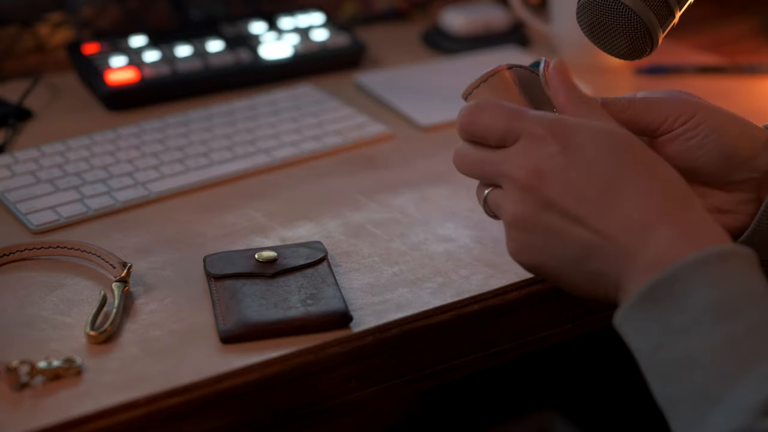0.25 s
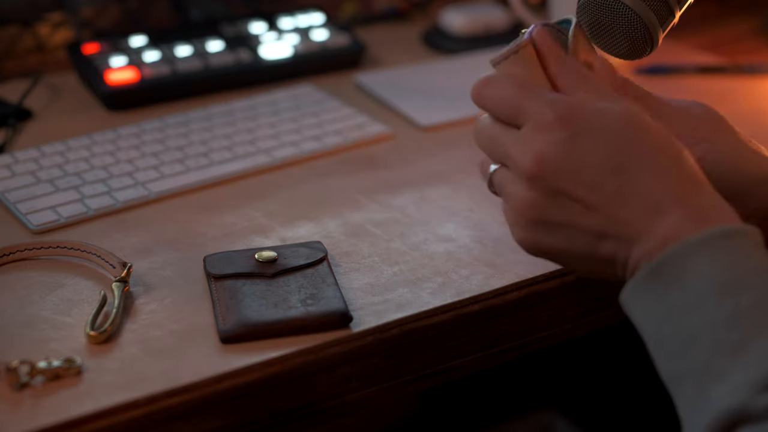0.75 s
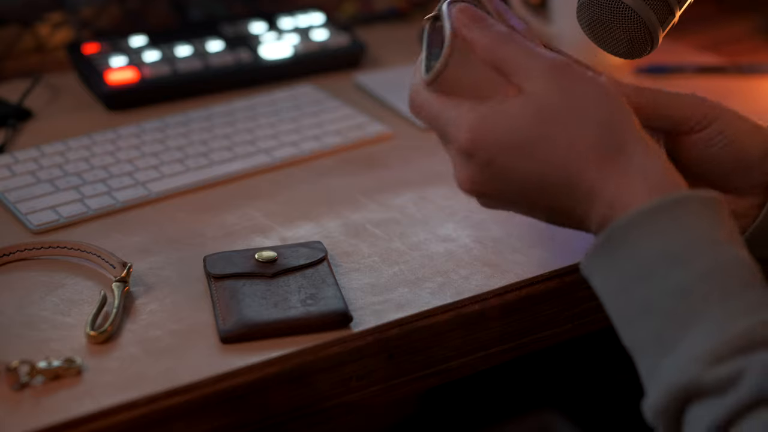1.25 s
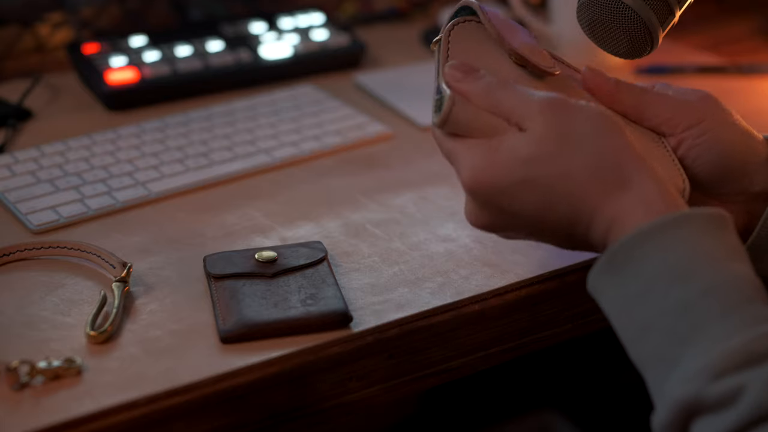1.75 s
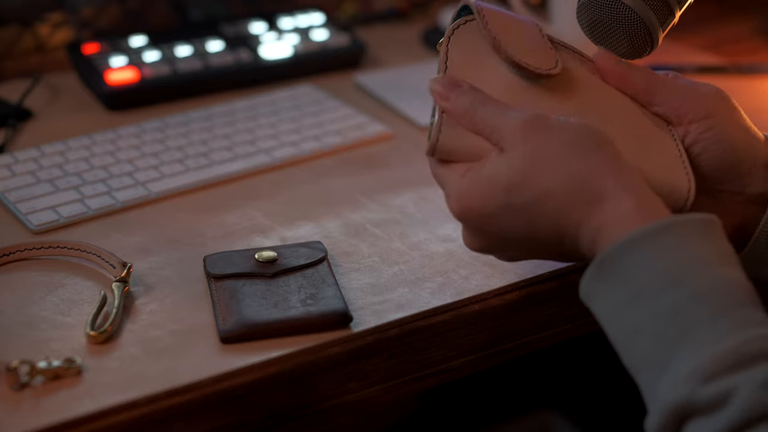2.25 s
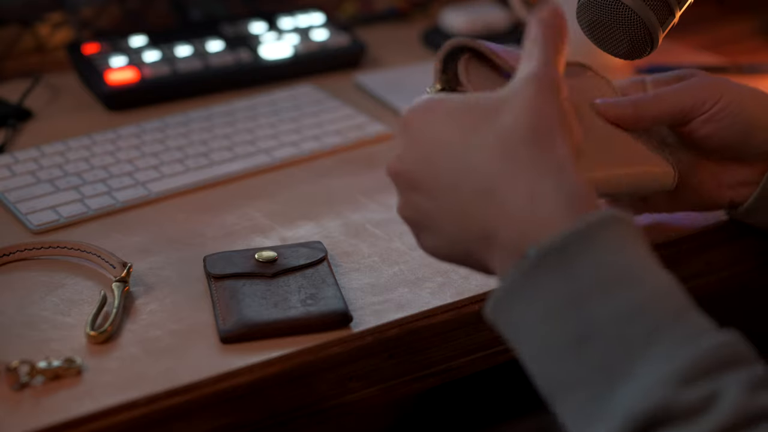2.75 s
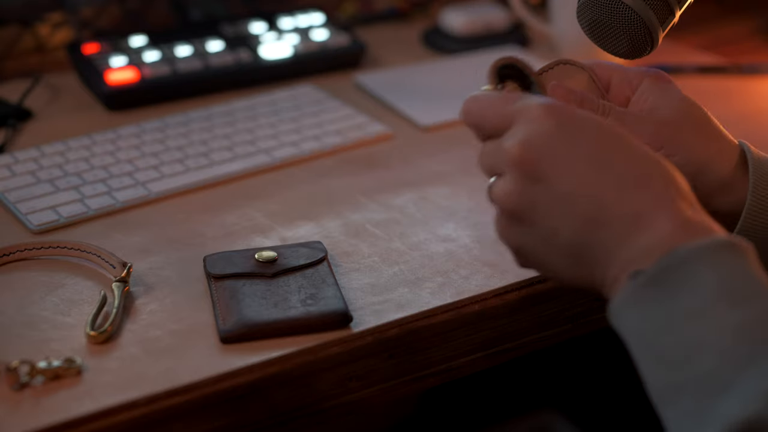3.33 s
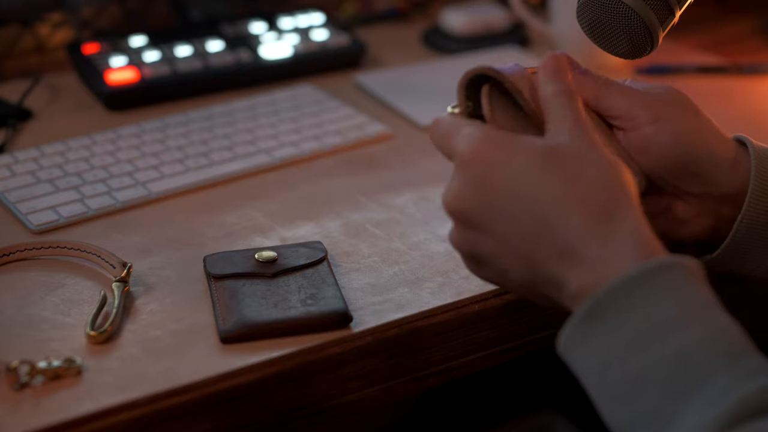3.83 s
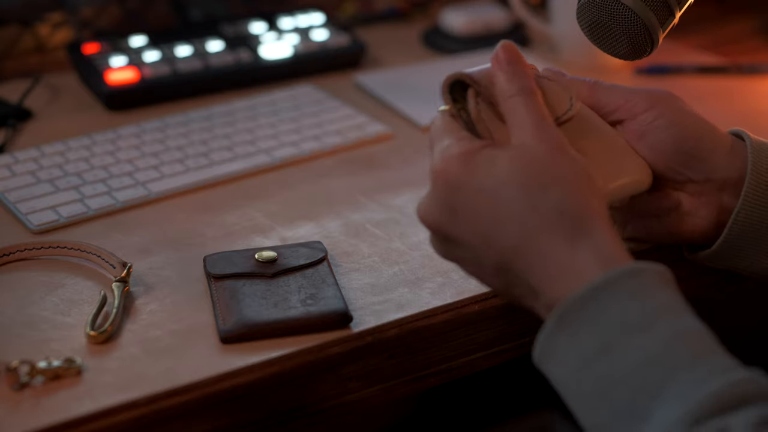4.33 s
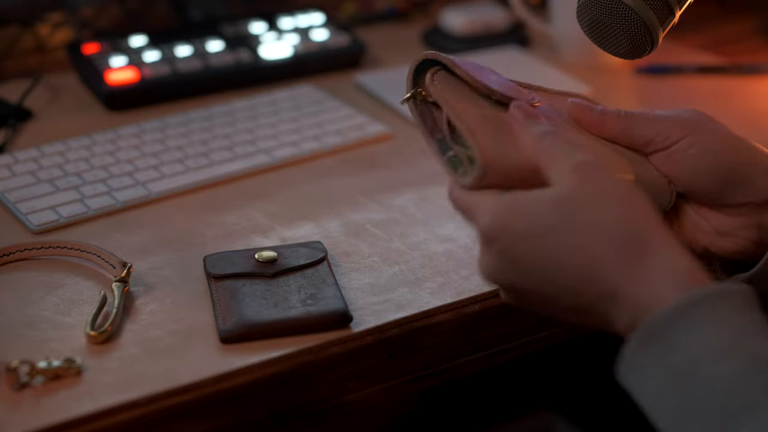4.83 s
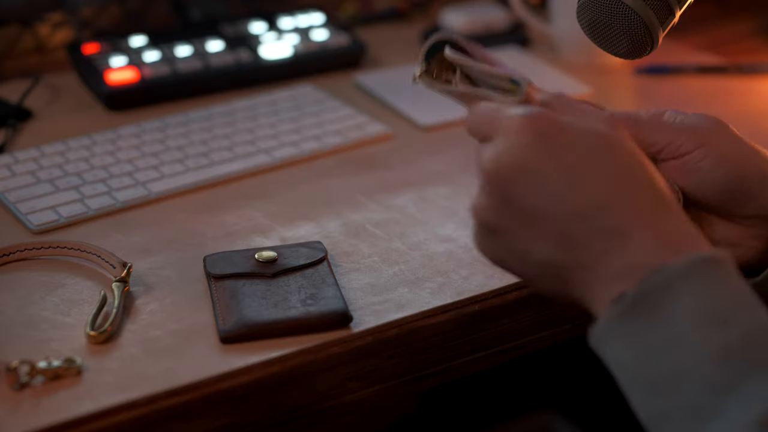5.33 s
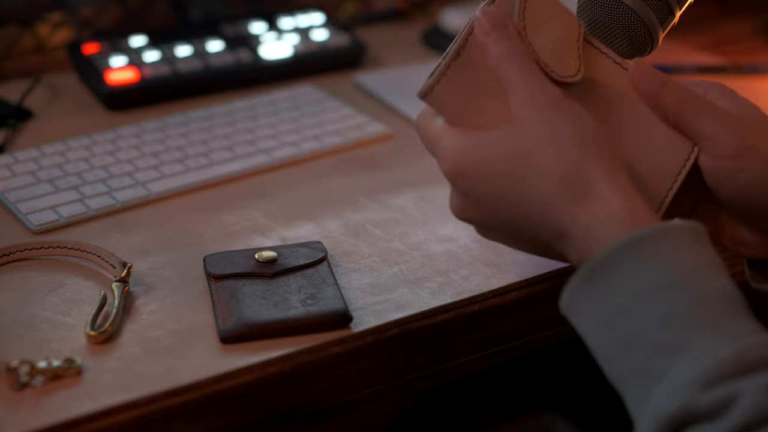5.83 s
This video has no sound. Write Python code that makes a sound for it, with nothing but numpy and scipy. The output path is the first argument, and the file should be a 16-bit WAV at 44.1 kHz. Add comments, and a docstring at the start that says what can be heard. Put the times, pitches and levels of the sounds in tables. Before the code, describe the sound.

A stiff wallet is bent and folded by hand, heard very near in a small quiet room. Irregular bright leather snaps open, with a heavy jolt among them, then the handling nearly stops. Grainy skin rustle and quick creaking runs resume, peak in a dense stuttering creak past the middle, and thin out through a short hollow groan to light clicks and faint rubbing over steady soft noise.

```python
"""In a quiet room, close to a desk microphone, a stiff leather wallet is flexed and folded by hand.
Its faces stick and slip: short bursts of noise make sharp snaps, runs of creaks and a dense crackle.
Skin rustles and drags over the leather as wavering or grainy noise. The hollow pockets ring briefly,
and a squeezed one groans. The handling shakes a low resonance of desk and stand, over a soft steady
background noise."""
import sys
import numpy as np
from scipy import signal
from scipy.fft import rfft, irfft, next_fast_len
from scipy.io import wavfile
from scipy.ndimage import map_coordinates

SR = 44100
rng = np.random.default_rng(int(sys.argv[2]) if len(sys.argv) > 2 else 0)


def unload_audio(sound):
    """Save the sound as a 16-bit wav file, at the path given as the first command line argument."""
    columns = np.transpose(np.atleast_2d(sound))
    # keep every value between -1 and 1, then stretch to whole-number steps
    steps = np.round(np.clip(columns, -1, 1) * 32767)
    wavfile.write(sys.argv[1], SR, steps.astype(np.int16))


def makeup_ratio(level_db):
    """Linear amplitude ratio for a level in decibels (20 dB per factor of ten)."""
    decades = np.asarray(level_db, float) / 20
    return 10 ** decades


N = 268128  # length of the scene in samples

# All levels in the tables are relative: the functions may add a fixed number of dB to a whole column.
# Steady noise of room and preamplifier, its colour: pitch_hz, level_db (per Hz)
BACKGROUND_COLOUR = [(18, -51.5), (30, -10.5), (97, -6.5), (379, -17), (492, -16.5), (691, -37.5),
                     (874, -16), (1360, -24.5), (9000, -28), (15500, -27)]
# How long the room's answer takes to fall by 60 dB: pitch_hz, fall_s
ROOM_FALL = [(300, 0.17), (3000, 0.16), (12000, 0.036)]
# Resonances of desk and microphone stand: pitch_hz, width_hz, level_db
STAND_MODES = [(90.9, 12.3, 2), (158, 95, -6), (284, 236, -8.5)]
# Slips that also jolt the whole wallet: start_s, level_db
WALLET_JOLTS = [(0.054, -50.5), (0.176, -52), (0.222, -48.5), (.341, -29.5), (0.68, -45), (1.978, -64),
                (3.935, -55.5)]
# Handling rumble, above or below what the effort gives: time_s, level_db
RUMBLE_CHANGES = [(0, 4.5), (.35, 6), (.6, 1.5), (.86, 4.5), (1.3, -1.5), (1.58, -5), (1.68, 3),
                  (2.3, -0.5), (2.42, -26), (2.56, 4), (2.9, -0.5), (3.4, 1.5), (3.82, -5), (3.95, -0.5),
                  (4.49, 6), (4.7, -0.5), (4.93, 5), (5.3, -5), (5.5, 6), (6.08, -1)]
# How hard the hands work the leather, as loudness of the rustle: time_s, level_db
HAND_EFFORT = [(0, -60), (.16, -58.5), (.3, -59), (.39, -50.5), (.42, -60), (.57, -57), (.68, -50.5),
               (.74, -63.5), (.87, -62), (.91, -69.5), (1.01, -80), (1.27, -74.5), (1.59, -69.5),
               (1.65, -60.5), (1.72, -60), (1.79, -53.5), (1.92, -50), (1.95, -65), (1.99, -49.5),
               (2.01, -60), (2.06, -48), (2.17, -59.5), (2.33, -55), (2.37, -71.5), (2.48, -72),
               (2.55, -58), (2.66, -64.5), (2.73, -74.5), (2.76, -57), (2.8, -60.5), (2.93, -51),
               (3.0, -53), (3.28, -44), (3.39, -48), (3.43, -60), (3.52, -59), (3.57, -53), (3.71, -68),
               (3.84, -67.5), (3.92, -51), (4.08, -62), (4.18, -58), (4.22, -62.5), (4.28, -61.5),
               (4.32, -55), (4.4, -62), (4.5, -64.5), (4.6, -76.5), (4.63, -86.5), (4.7, -75.5),
               (4.77, -66.5), (4.84, -61), (4.93, -60.5), (5.04, -64), (5.1, -78), (5.25, -73.5),
               (5.32, -72), (5.39, -70), (5.44, -61), (5.52, -66.5), (5.61, -62.5), (5.68, -81.5),
               (5.9, -90), (6.0, -77.5), (6.08, -84.5)]
# The fold of the wallet: time_s, pocket_db (ring compared with rustle), shut (0 open to 1 pressed shut)
FOLDING = [(0, -7, 0.04), (.34, 4.5, 0.19), (.69, -0.5, 0.16), (.86, 5, 0.2), (1.27, -1, 0.65),
           (1.68, 9, 0.24), (1.95, 0.5, 0.02), (2.3, -1, 0.27), (2.75, 0, 0.13), (3.0, 2, .8),
           (3.35, 3.5, 0.68), (3.5, 0.5, 0.7), (3.8, 3.5, 0.66), (4.0, -2.5, .3), (4.3, -1.5, 0.3),
           (4.49, 6.5, 0.47), (4.8, -0.5, 0.13), (5.3, 0.5, 0.33), (5.44, 1.5, 0), (6.08, 3, 0.96)]
# Pockets of the open wallet: pitch_hz, width_hz, level_db
OPEN_POCKETS = [(418, 142, 0), (1048, 640, 6.5), (1737, 1660, 1)]
# Pockets pressed shut: pitch_hz, width_hz, level_db
SHUT_POCKETS = [(613, 112, 1), (805, 44.5, 1.5), (1334, 100, -13)]
# Fingers dragging over the leather, each in one band: start_s, length_s, pitch_hz, level_db
FINGER_STROKES = [(0.34, 0.028, 490, -43.5), (0.669, 0.035, 447, -53), (1.27, 0.17, 1320, -70.5),
                  (1.3, 0.26, 6860, -68.5), (1.999, 0.086, 302, -59.5), (4.293, 0.14, 3150, -61),
                  (5.428, 0.04, 1590, -54.5), (5.575, 0.027, 4170, -49.5), (0.443, 0.018, 1790, -53.5)]
# Slow slips deep in a squeezed pocket, a low groan: start_s, level_db
SLOW_SLIPS = [(4.438, -56), (4.448, -51), (4.457, -47), (4.467, -44.5), (4.484, -42.5), (4.507, -45.5),
              (4.52, -57)]
# Resonances of the squeezed pocket: pitch_hz, width_hz, level_db
SQUEEZED_POCKET = [(787, 43, 2), (1080, 51, -7.5)]
# Colour of the leather surface: pitch_hz, level_db (per Hz)
LEATHER_COLOUR = [(710, -40), (1200, 2), (1240, 1.5), (1950, -14.5), (5300, -2.5), (9410, -5.5),
                  (16000, -17.5)]
# Treble above about 7 kHz, compared with what the effort gives: time_s, level_db
TREBLE_CHANGES = [(0, -0.5), (.6, 5), (1.2, 0), (1.7, 0), (2.2, 2.5), (2.75, -1), (3.4, -7), (3.57, 1),
                  (3.9, 1), (4.28, -5), (4.36, 16.5), (4.5, -3.5), (5.0, 3.5), (6.08, -2.5)]
# Creaks, each a run of slips: start_s, length_s, mean_gap_s, level_db (over the rustle), pitch_hz
CREAK_RUNS = [(1.475, 0.11, 0.008, 23, 7300), (1.62, 0.11, 0.014, 31.5, 7200),
              (1.736, .035, 0.0082, 22, 6900), (1.806, 0.04, 0.014, 27.5, 5000),
              (1.879, 0.043, 0.011, 18, 4630), (2.878, 0.029, 0.0079, 15, 5200),
              (2.946, .09, .0094, 18, 5030), (3.054, 0.042, .022, 22, 4640), (3.2, 0.09, .0115, 14, 5270),
              (3.301, 0.09, 0.0087, 17.5, 5600), (3.542, 0.039, 0.0069, 26, 7200),
              (3.65, 0.034, 0.0099, 23, 6100), (3.859, 0.051, 0.0098, 25.5, 5500),
              (4.007, 0.041, 0.0087, 30.5, 7300), (4.153, 0.029, 0.0053, 24, 6250),
              (4.34, 0.024, 0.013, 27.5, 8540), (4.754, 0.019, 0.01, 32.5, 6840),
              (0.382, .022, .007, 17.5, 5030), (0.435, 0.025, 0.0086, 21.5, 6000),
              (3.734, 0.14, 0.012, 19, 7500), (5.139, .04, 0.011, 22, 6500), (5.977, .04, 0.014, 19, 7000)]
# Slips placed one by one, faint to loud, among them the long creak near 3.0-3.4 s:
# start_s, level_db, pitch_hz, pocket_db (knock compared with the snap)
PLACED_SLIPS = [(0.026, -38.5, 6500, -28), (0.0507, -25.5, 3900, -11), (0.071, -36.5, 5030, -14),
                (.103, -22, 4380, -20), (.11, -28, 5270, -20.5), (0.1775, -18, 4300, -12.5),
                (.204, -22.5, 5210, -28), (0.2231, -17, 5030, -15.5), (0.2618, -20, 4230, -15),
                (.303, -27, 7800, -14.5), (0.3178, -21, 4130, -30), (.339, -10.5, 5000, -11.5),
                (.3678, -25, 5440, -24.5), (0.3855, -26, 5480, -22), (.436, -32, 6400, -19),
                (.4824, -27.5, 6300, -15), (.507, -32, 5300, -14.5), (0.546, -32.5, 5820, -10),
                (0.5894, -14.5, 7000, -29), (.6077, -40, 4560, -13), (0.6382, -25, 6060, -19),
                (.7, -31.5, 4480, -2.5), (0.752, -35.5, 4360, -13), (0.829, -42, 6590, -20),
                (0.9478, -37.5, 4700, -16), (1.123, -56, 5000, -13), (1.2123, -50, 7000, -14),
                (1.7304, -27, 7000, -24), (1.7772, -24.5, 5940, -16), (1.7833, -28, 5630, -12),
                (1.8718, -24.5, 5250, -10), (1.9043, -21.5, 6360, -17), (1.9188, -25, 4480, -7.5),
                (1.966, -38.5, 5850, -19), (1.9765, -26.5, 3760, -3.5), (2.016, -36, 5810, -25),
                (2.03, -31, 5640, -9.5), (2.0387, -25, 4660, -22), (2.0522, -22.5, 5830, -20),
                (2.0705, -30.5, 3680, -2), (2.0783, -28, 5480, -38), (2.11, -29, 3230, -27),
                (2.1335, -26, 4130, -22), (2.224, -35, 6200, -12), (2.493, -43, 7490, -20),
                (2.5183, -37, 5870, -15), (2.5374, -39.5, 4300, -5), (2.619, -32.5, 5600, -10.5),
                (2.7551, -32, 4900, -9.5), (2.7898, -40, 5540, -13), (2.8271, -33, 3540, -9.5),
                (2.9255, -32, 4850, -15), (3.034, -30, 4320, -6.5), (3.0387, -27.5, 5540, -20),
                (3.0634, -25.5, 5070, -11.5), (3.083, -24.5, 4300, -16), (3.1084, -28.5, 4140, -14),
                (3.1252, -25, 4500, -27), (3.1366, -27, 4200, -8), (3.1536, -26.5, 4140, -21.5),
                (3.1762, -24, 4220, -35), (3.203, -25, 4070, -6), (3.223, -23.5, 4200, -38),
                (3.239, -24.5, 4220, -25), (3.259, -21, 4600, -7.5), (3.279, -31, 5110, -3),
                (3.298, -16.5, 4400, -30), (3.321, -19.5, 4350, -20), (3.333, -27.5, 4600, -27),
                (3.3433, -20.5, 4300, -11), (3.3651, -20, 4300, -14), (3.3737, -17, 4770, -13.5),
                (3.3941, -16.5, 4220, -26), (3.4563, -42, 5440, -14), (3.4646, -29.5, 7560, -8.5),
                (3.4714, -26, 5600, -19), (3.6433, -35.5, 6260, -12), (3.813, -39.5, 6210, -16),
                (3.8396, -39, 6500, -20), (3.8776, -32.5, 4200, -36), (3.9334, -21.5, 4640, -20.5),
                (3.9857, -31.5, 4240, -19), (4.1039, -31, 5740, -17), (4.113, -30, 7700, -36),
                (4.1824, -27.5, 6100, -20), (4.2123, -36.5, 4820, -12), (4.245, -30.5, 7650, -27),
                (4.2642, -41, 5420, -26), (4.2802, -31, 8800, -39), (4.3065, -29.5, 4020, -14.5),
                (4.457, -46, 2500, -2), (4.467, -49, 2500, -4), (4.4836, -43.5, 3100, 4.5),
                (4.507, -37, 3650, -14), (4.5772, -52, 2500, 1.5), (4.7946, -33.5, 5670, -18),
                (4.86, -38, 6400, -22), (5.0238, -38, 6400, -17), (5.1275, -39.5, 5360, -24),
                (5.2078, -41, 5230, -15), (5.226, -42.5, 5030, -15), (5.3435, -40, 7100, -30),
                (5.3592, -50, 6000, -4), (5.3815, -45.5, 3570, -4.5), (5.4021, -36, 5160, -17),
                (5.431, -48, 3300, -8), (5.6074, -32, 5700, -33), (5.632, -37, 5600, -39.5)]

BACKGROUND_DB = -75.6
REFERENCE_EFFORT_DB = -58
RUMBLE_DB, RUMBLE_GROWS = -65.5, 0.61  # level at reference effort; dB gained per dB of effort
DULLING = 0.2  # treble dB lost per dB of effort
SHIFT_DB, FLUTTER_DB = 3, 1.5  # strength of the slow and fast wavering of the skin rustle
SLOWING = 0.035  # each gap in a creak grows by this share of the mean gap
CREAK_POCKET_DB = -19  # pocket knock compared with the slip, before a fixed lift
GAP_SCATTER, SIZE_SCATTER_DB, PITCH_SCATTER = 0.05, 2.5, 0.07  # gap and pitch scatter are shares
SWELL_DB, SWELL_SLIPS = 5.5, 1.4  # a run starts this much softer; the lack fades over this many slips
BREADTH_PER_DB = 0.02  # weaker slips free a smaller patch, with a narrower band
RELEASE, RELEASE_SHUT = 5, 7  # sharpness of a slip's first instant; more when pressed tight


def unit(x):
    """Scale to an average (rms) level of 1."""
    return x / np.sqrt(np.mean(x ** 2) + 1e-20)


def along(points, hz):
    """Read (pitch, value) points on a logarithmic pitch axis."""
    f, value = np.transpose(points)
    return np.interp(np.log(hz + 1), np.log(f + 1), value)


def curves(rows):
    """Give one value per sample for each column after the time."""
    s, *columns = np.transpose(rows)
    return [np.interp(np.arange(N) / SR, s, column) for column in columns]


def wobble(rate):
    """A smooth random curve with this many random points a second."""
    points = rng.standard_normal(int(N * rate / SR) + 4)
    return map_coordinates(points, [np.arange(N) * rate / SR])


def filtered(x, response):
    """Colour a sound by a response to each frequency."""
    size = next_fast_len(x.shape[-1] + 8192)
    spectrum = rfft(x, size) * response(np.fft.rfftfreq(size, 1 / SR))
    return irfft(spectrum, size)[..., :x.shape[-1]]


def resonances(modes):
    """Ringing modes side by side, with alternating sign, as a response to frequency."""
    def response(f):
        total = 0
        for k, (hz, width, db) in enumerate(modes):
            mode = 1j * f * width / (hz * hz - f * f + 1j * f * width)
            total = total + (-1) ** k * makeup_ratio(db) * mode
        return total
    return response


def laid(s, shapes):
    """Add short sounds together at their start times."""
    at = np.round(s * SR).astype(int)[:, None] + np.arange(shapes.shape[1])
    return np.bincount(at.ravel(), shapes.ravel(), N + SR)[:N]


def effort():
    """The rustle level, and how far it stands above the reference effort (dB)."""
    rustle_db, = curves(HAND_EFFORT)
    return rustle_db, rustle_db - REFERENCE_EFFORT_DB


def pockets(x):
    """The hollow ring passes from the open to the narrower shut resonances as the fold is pressed."""
    shut = np.clip(curves(FOLDING)[1], 0, 1)
    open_ring = np.sqrt(1 - shut) * filtered(x, resonances(OPEN_POCKETS))
    shut_ring = np.sqrt(shut) * makeup_ratio(5) * filtered(x, resonances(SHUT_POCKETS))
    return open_ring + shut_ring


def snaps(s, db, hz, t60, tail_db, tail_t60, breadth, size, release):
    """A slip: one sharp release and a shiver after it, coloured by the patch that let go."""
    t = np.arange(size) / SR
    fading = makeup_ratio(-60 * t / t60) + makeup_ratio(tail_db - 60 * t / tail_t60)
    burst = rng.standard_normal((len(s), size)) * fading
    burst[:, 0] = -release
    f, center = np.fft.rfftfreq(size, 1 / SR), hz[:, None]
    width = breadth * center
    patch = 1j * f * width / (center * center - f * f + 1j * f * width)
    shape = irfft(rfft(burst) * patch ** 2, size)
    shape *= (2.97 * makeup_ratio(db) / np.linalg.norm(shape, axis=1))[:, None]  # set each slip's energy
    return laid(s, shape)


def hush():
    """Steady background noise of room and preamplifier, coloured by its own curve."""
    noise = filtered(rng.standard_normal(N), lambda hz: makeup_ratio(along(BACKGROUND_COLOUR, hz)))
    return makeup_ratio(BACKGROUND_DB) * unit(noise)


def room(x):
    """The room answers with a noise tail in which each frequency dies at its own speed."""
    hz, t, z = signal.stft(rng.standard_normal(SR // 3), SR, nperseg=256)
    fading = makeup_ratio(-60 * t / along(ROOM_FALL, hz)[:, None])
    tail = signal.istft(z * fading, SR, nperseg=256)[1]
    delayed = np.pad(x, (200, 0))  # samples
    return signal.fftconvolve(delayed, tail / np.linalg.norm(tail))[:N]


def handling():
    """Shifting hands and jolts shake the desk and the microphone stand."""
    rumble_db = RUMBLE_DB + RUMBLE_GROWS * effort()[1] + curves(RUMBLE_CHANGES)[0]
    restless = rng.standard_normal(N) * makeup_ratio(0.33 * wobble(15))
    shake = unit(filtered(restless, resonances(STAND_MODES)))
    s, db = np.transpose(WALLET_JOLTS)
    t = np.arange(1024) / SR
    push = -np.sin(2 * np.pi * 170 * t) * makeup_ratio(-60 * t / 0.028)
    jolts = laid(s, makeup_ratio(db + 7.5)[:, None] * push)
    jolts = filtered(jolts, lambda hz: 1j * hz / (70 + 1j * hz))  # lose the lowest bass
    return makeup_ratio(rumble_db) * shake + jolts


def strokes():
    """Grainy friction noise swells and fades in one broad resonance of the gripped patch."""
    out = np.zeros(N)
    for s, length, hz, db in FINGER_STROKES:
        n = int(length * SR)
        rub = rng.standard_normal(n) * np.sqrt(rng.exponential(size=n))
        band = resonances([(hz, 0.95 * hz, 0)])
        sung = unit(filtered(rub, lambda f: band(f) ** 2))
        out[int(s * SR):][:n] += makeup_ratio(db) * sung * np.hanning(n) ** 0.73
    return out


def groan():
    """Each slow slip pushes the air of the squeezed pocket, which rings on."""
    s, db = np.transpose(SLOW_SLIPS)
    pushes = laid(s, makeup_ratio(db + 25)[:, None] * np.hanning(16))
    return filtered(pushes, resonances(SQUEEZED_POCKET))


def crackle(per_second, spread_db, clump_db):
    """Countless tiny slips in clumps, a few much larger than the rest; rms 1."""
    place, size, pitch = rng.random((int(per_second * N / SR), 3)).T
    db = -spread_db * np.log(size + 0.097)
    hz = 2200 * 6.2 ** pitch
    ticks = snaps(place * (N / SR), db, hz, t60=0.022, tail_db=5, tail_t60=0.016,
                  breadth=1.55, size=512, release=8.3)
    return unit(ticks * makeup_ratio(clump_db * wobble(25)))


def flexing():
    """Crackle and skin rustle sound through the surface and, duller, through the pockets."""
    rustle_db, extra_db = effort()
    pocket_db = curves(FOLDING)[0]
    bright_db = 2.5 - DULLING * extra_db + curves(TREBLE_CHANGES)[0]
    waver_db = FLUTTER_DB * wobble(40) + SHIFT_DB * wobble(12)
    skin = unit(rng.standard_normal(N) * makeup_ratio(waver_db))
    drive = 0.75 * crackle(per_second=500, spread_db=4.0, clump_db=0.94) + 0.67 * skin
    surface = unit(filtered(drive, lambda hz: makeup_ratio(along(LEATHER_COLOUR, hz))))
    # lighter rubbing tilts the sound toward the treble, harder work away from it
    top = filtered(surface, lambda hz: 1 / (1 + (7000 / (hz + 1)) ** 4))
    tilted = surface + (makeup_ratio(bright_db) - 1) * top
    hollow = unit(pockets(drive))
    return makeup_ratio(rustle_db - 0.96) * tilted + makeup_ratio(rustle_db + pocket_db - 5.0) * hollow


def creaks():
    """Each run slips again and again, ever slower, as loud as the hands press; columns as in PLACED_SLIPS."""
    start, length, gap, over_db, hz = np.transpose(CREAK_RUNS)[..., None]
    k = np.arange(20)  # slips in a run, counted from 0
    draw = rng.standard_normal((len(CREAK_RUNS), 4, len(k)))
    slowing = 1 + SLOWING * (k - length / gap / 2)
    gaps = gap * slowing * np.exp(GAP_SCATTER * draw[:, 0])
    s = start + np.cumsum(gaps, axis=1) - gaps
    s = np.minimum(s, (N - 1) / SR)
    db = effort()[0][(s * SR).astype(int)] + over_db
    db = db - SWELL_DB * np.exp(-k / SWELL_SLIPS) + SIZE_SCATTER_DB * draw[:, 1]
    db = db - 200 * (s > start + length)  # silence slips past the end of the run
    pitch = hz * np.exp(PITCH_SCATTER * draw[:, 2])
    columns = s, db, pitch, CREAK_POCKET_DB + 5 * draw[:, 3]
    return np.reshape(columns, (len(columns), -1))


def slips():
    """Placed slips and creak runs: each slip a bright snap, and a knock that rings the pockets."""
    s, db, hz, pocket_db = np.hstack([np.transpose(PLACED_SLIPS), creaks()])
    # leather pressed tight rings in a narrower band and breaks sharper
    shut = curves(FOLDING)[1][(s * SR).astype(int)]
    breadth = np.clip(1.6 - 0.84 * shut + BREADTH_PER_DB * (db + 30), 0.4, 3)[:, None]
    bright = snaps(s, db + 0.21, hz, t60=0.013, tail_db=-7.5, tail_t60=0.03,
                   breadth=breadth, size=2048, release=RELEASE + RELEASE_SHUT * shut)
    knock = snaps(s, db + pocket_db + 10.0, np.full(len(s), 1100), t60=0.026, tail_db=-6.5,
                  tail_t60=0.1, breadth=11.8, size=2048, release=9.2)
    # soft leather damps the highest treble of each snap
    soft = filtered(bright, lambda f: 1 / (1 + 1j * f / (0.59 * 12500) - (f / 12500) ** 2))
    return soft + pockets(knock)


def scene():
    """The wallet, its room answer, the handling and the background, as one channel."""
    wallet = slips() + flexing() + groan() + strokes()
    return (wallet + makeup_ratio(-13.5) * room(wallet) + handling() + hush())[None]


def top_cut(x):
    """Nothing passes above the cut-off."""
    return signal.sosfilt(signal.butter(12, 16820, fs=SR, output="sos"), x)


def record(dry):
    """The input stage rolls off the top and sags below zero as the sound grows."""
    heard = filtered(dry, lambda hz: 1 / (1 + (hz / 15900) ** 40))
    level = np.abs(filtered(np.abs(heard), lambda hz: 1 / (1 + 1j * hz / 30)))  # smoothed loudness
    sag = 1.47 * level ** 1.283
    return top_cut(heard - sag)


dry = scene()
out = record(dry)
unload_audio(out)
```